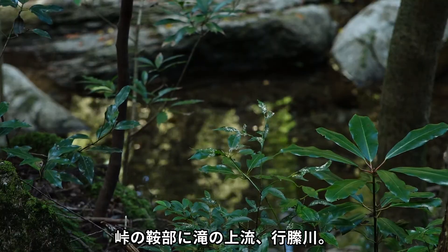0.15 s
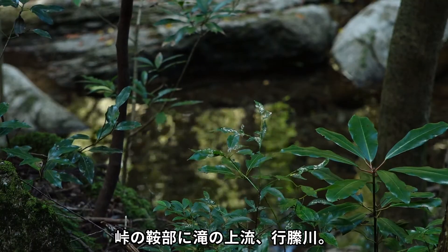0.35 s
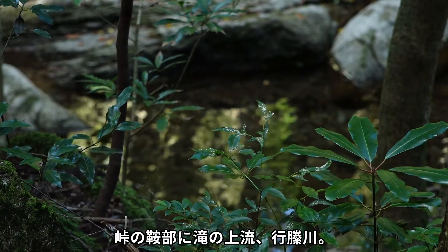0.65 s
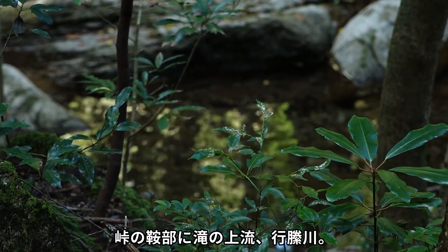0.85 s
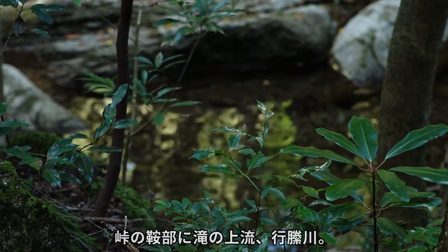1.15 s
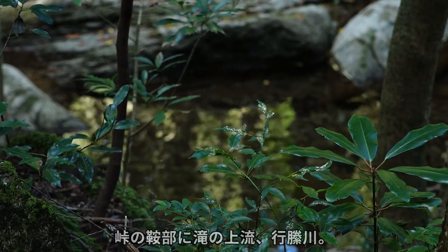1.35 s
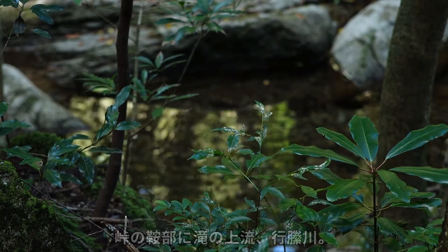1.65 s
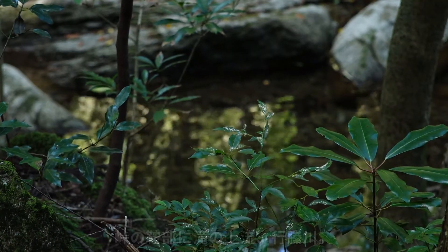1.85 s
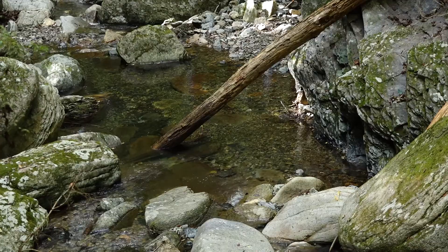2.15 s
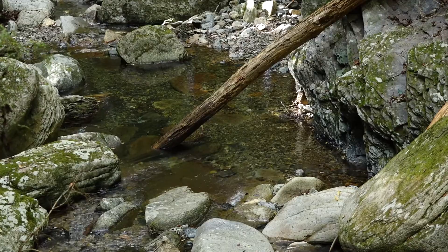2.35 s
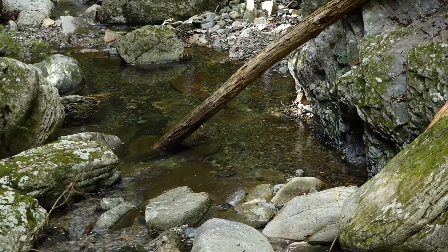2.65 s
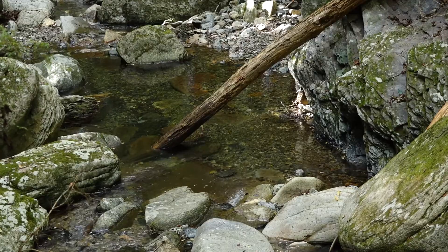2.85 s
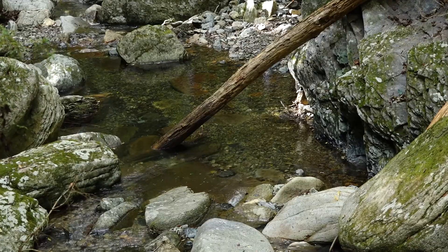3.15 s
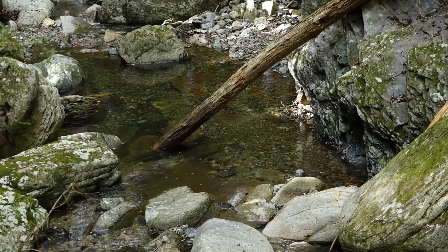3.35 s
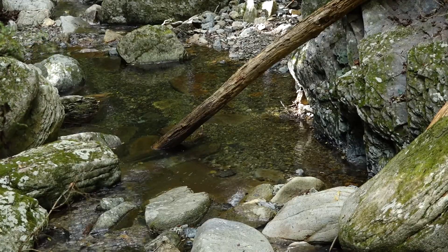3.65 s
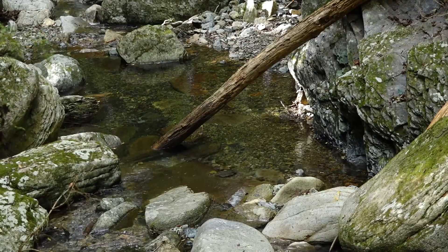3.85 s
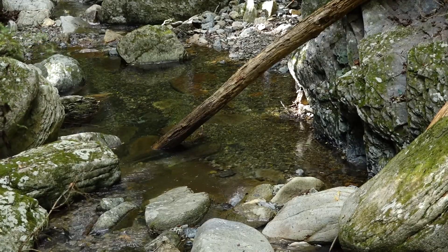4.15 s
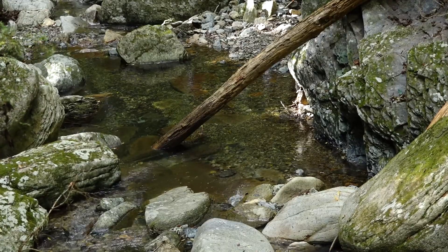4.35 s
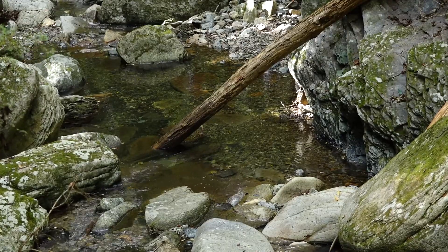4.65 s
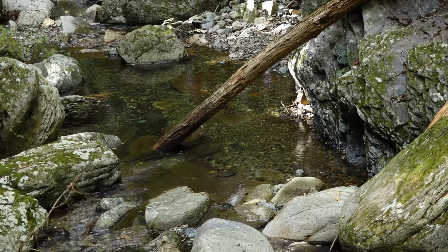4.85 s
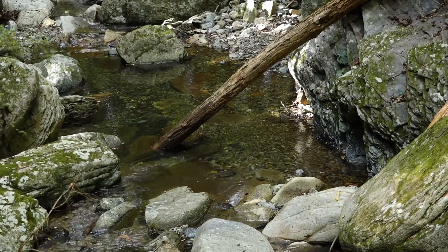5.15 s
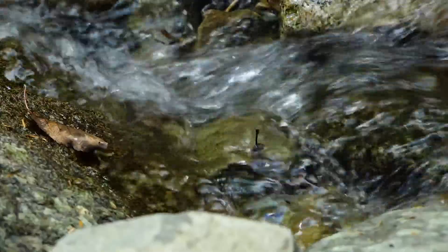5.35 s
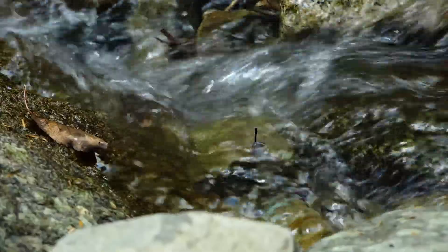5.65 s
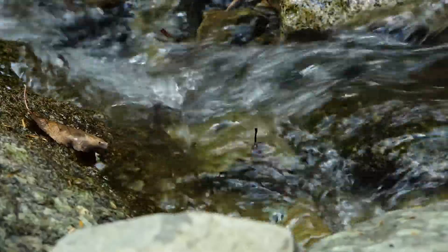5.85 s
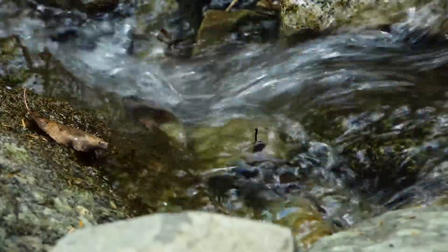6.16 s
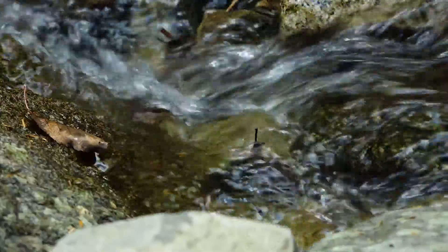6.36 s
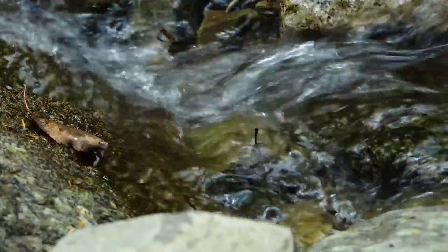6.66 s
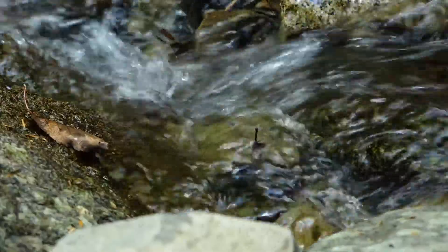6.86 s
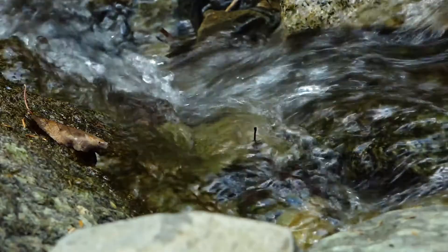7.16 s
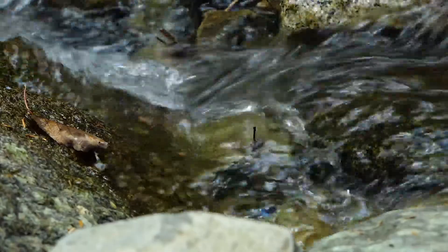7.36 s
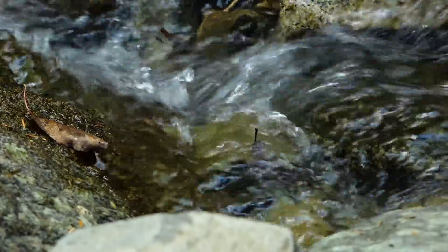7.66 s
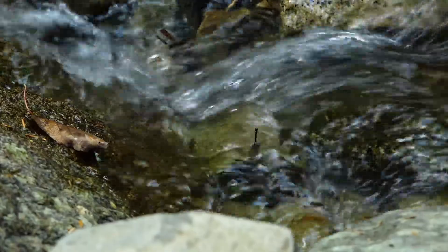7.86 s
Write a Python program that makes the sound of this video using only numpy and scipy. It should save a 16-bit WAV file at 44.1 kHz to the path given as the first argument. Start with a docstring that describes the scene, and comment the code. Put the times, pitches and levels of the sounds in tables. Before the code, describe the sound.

From 0 to 2 seconds a forest stream is heard from the bank: a smooth, soft, fairly quiet wash of fine bubbling. Two very short, faint, whistled bird chirps come at about 0.1 and 0.3 seconds, and small drips click at 0.3, 0.5 and 1.5. From 0.6 the water fades down. At 2.0 the view cuts to a boulder bed; a steady, even, hissier rush rises until about 2.8, with dull lumpy wind buffeting the stereo microphone, gusting strongest around 3.3 to 4.3 and easing near 4.8. At 5.3 a sudden cut goes close over a riffle, staying lively to the end at 8: brighter, uneven rushing, crowded gurgles and hollow plops, sharp drops around 6.0, 6.3 and 6.9, and brief crisp spatters, notably at 5.8, 6.1, 6.4, 6.9 and 7.4. It stops without a fade.

```python
"""Stream water in the mountains, heard from three spots in turn: a bank above a pool (fading out),
a windy boulder bed (fading in) and close over a riffle. Far water is a patchy noise hiss, near water
a swarm of short ringing tones, one for each bubble; the loudest bubbles and drops are placed singly.
A bird chirps twice in gliding whistles. At the second spot low, lumpy noise is the wind buffeting
the stereo microphone. At the riffle, short bursts of treble noise are splashes."""
import sys
import numpy as np
from scipy import signal
from scipy.fft import rfft, irfft, next_fast_len
from scipy.io import wavfile
from scipy.ndimage import uniform_filter1d

SR = 44100
rng = np.random.default_rng(int(sys.argv[2]) if len(sys.argv) > 2 else 0)


def to_wav(s):
    """Save 16-bit WAV."""
    ch = np.atleast_2d(s).T  # columns
    pcm = np.round(np.clip(ch, -1, 1) * 32767)  # PCM
    wavfile.write(sys.argv[1], SR, pcm.astype(np.int16))


N = 352800  # samples: 8 s


def gain_of(db):
    """Turns decibels into an amplitude factor."""
    return 10 ** (np.asarray(db) / 20)


def evened(x):
    """Scales a signal to an average power of one."""
    return x / np.sqrt(np.mean(x ** 2) + 1e-20)


def read(points, hz):
    """Reads a curve at any frequency, in straight lines over a logarithmic scale."""
    f, value = np.transpose(points)
    return np.interp(np.log(hz + 1), np.log(f + 1), value)


def level(curve, start, size):
    """Turns a table of times and decibels into a gain for each sample from start on."""
    s, db = np.transpose(curve)
    return gain_of(np.interp(start + np.arange(size) / SR, s, db))


def add(mix, s, sound):
    """Adds a sound to the mix from s seconds on, cut off at the end of the mix."""
    part = mix[:, round(s * SR):][:, :sound.shape[1]]
    part += sound[:, :part.shape[1]]


def ports(first, second, colour, same, lean, lead):
    """Colours two unrelated sounds and blends them into the left and right microphone ports."""
    size = next_fast_len(len(first))
    hz = np.fft.rfftfreq(size, 1 / SR)
    a, b = rfft(first, size), rfft(second, size)
    alike = np.clip(read(same, hz), 0, 1)
    half_lean = gain_of(read(lean, hz) / 2)
    # the right port hears the first sound shifted in phase, plus a share of the second
    right = alike * a * np.exp(-1j * read(lead, hz)) + np.sqrt(1 - alike ** 2) * b
    spectra = np.array([a * half_lean, right / half_lean]) * gain_of(read(colour, hz))
    pair = irfft(spectra, size)[:, :len(first)]
    return pair / np.sqrt(np.mean(pair.mean(0) ** 2))


def hiss(size, patchy_db, spatter_db):
    """Far water: two white noises sharing drifting patches and a brief spatter in the treble."""
    frames, hz = size // 64 + 5, np.fft.rfftfreq(256, 1 / SR)
    a, b, c, d, patches = rng.standard_normal((frames, 129, 5)).T
    # a patch spans 3 neighbouring bands and about 50 ms
    patches = uniform_filter1d(patches, size=3, axis=0)
    patches = evened(uniform_filter1d(patches, size=36, axis=1))
    spray = evened(uniform_filter1d(rng.exponential(1, frames) ** 2, size=4))
    treble = hz / (hz + 6200.0)
    change_db = patchy_db * patches + spatter_db * np.outer(treble, spray)
    z = np.array([a + 1j * b, c + 1j * d]) * gain_of(change_db)
    return evened(signal.istft(z, nperseg=256, noverlap=192)[1][:, :size])


def bubble(hz, cycles, rise, lag=0):
    """A ringing pocket of air whose pitch climbs as it nears the surface; lag in radians."""
    cycles = max(cycles, 1)
    u = np.arange(int(5 * cycles / hz * SR)) * hz / SR  # time in cycles of the first pitch
    envelope = (1 - np.exp(-2 * u)) * np.exp(-u / cycles)
    return envelope * np.sin(2 * np.pi * (u + rise * u * u / (2 * cycles)) - lag)


def swarm(size, per_s, spread_db, pitches):
    """Bubbles at random moments, small ones more often; even power per Hz."""
    out = np.zeros(size)
    for hz in pitches:
        chance = rng.random(size)
        bigness = np.minimum(rng.exponential(1, size), 5)
        starts = chance < per_s * hz ** .6 / np.sum(pitches ** .6) / SR
        train = starts * gain_of(spread_db * bigness)
        cycles = rng.uniform(0.696, 1.355) * 6.62 * (hz / 1000) ** -.3  # large pockets ring longer
        ring = bubble(hz, cycles, rng.uniform(0.06, 0.317))
        out += np.sqrt(hz) * evened(signal.oaconvolve(train, ring)[:size])
    return out / np.sqrt(len(pitches))


def water(size, grain, colour, same, lean, lead):
    """Hiss and bubbles of one spot; the rocks scatter a smeared copy of the bubbles to the far port."""
    share, per_s, spread_db, gurgle_db, patchy_db, spatter_db = grain
    share = np.clip(share, 0, 1)
    gurgle = swarm(size, 110., 1.9, np.geomspace(380, 1900, num=24))  # few large pockets
    small = swarm(size, per_s, spread_db, np.geomspace(260, 15000, num=64))
    pops = evened(small + gain_of(gurgle_db) * gurgle)
    # each narrow band arrives a few ms early or late, with its colour unchanged
    delays = 0.612 * evened(uniform_filter1d(rng.standard_normal(1025), size=4))
    rocks = irfft(np.exp(1j * np.cumsum(delays)))
    scattered = signal.oaconvolve(pops, np.roll(rocks, 1024), "same")
    bubbles = np.array([pops, scattered])
    both = np.sqrt(1 - share) * hiss(size, patchy_db, spatter_db) + np.sqrt(share) * bubbles
    return ports(*both, colour, same, lean, lead)


# when each listening spot is heard: (from t/s, to t/s)
LISTENING_SPOTS = [(0, 2.018), (2.018, 5.315), (5.315, 8)]
# water level at each spot, before the fader: (level/dB)
WATER_LEVELS = [-26.5, -25, -24]
# make-up of the water, one row a spot: (bubble share of the power [0-1], bubbles [per s],
# level spread [dB], gurgle over the other bubbles [dB], patches [dB], treble spatter [dB])
WATER_GRAIN = [(0.21, 3000, 1, -10, 0.1, 0), (0.1, 3000, 0, -9, .5, -1), (0.2, 2500, 2.5, -3.5, 1.17, 3.1)]
# spectrum of each spot's water, before the shared treble colour; at the first two spots the sound # ends near
# 15.1 kHz: (f/Hz, relative level/dB per Hz)
BANK_COLOUR = [(15, -76), (25, -49), (70, -26), (193, -17), (234, -11.5), (380, -14), (520, -6.5),
               (630, -5), (793, -7.5), (1000, -7), (2400, -10.5), (5000, -12), (9000, -12.5),
               (14900, -17.5), (15100, -75)]
BED_COLOUR = [(40, -45), (180, -11), (300, -4), (459, -7), (618, -2), (882, -4), (1040, -2.5), (2400, -6),
              (5000, -7.5), (9000, -6), (14950, -6), (15150, -65)]
RIFFLE_COLOUR = [(15, -65), (25, -42), (97, -19.5), (182, -13), (216, -12), (456, -6), (552, -4.5),
                 (694, -2.5), (1700, -5), (2400, -6), (5000, -7.5), (9000, -6.5), (15000, -7.5)]
# treble colour shared by the water and the splashes: (f/Hz, level/dB)
TREBLE_COLOUR = [(2600, 0), (3500, 1), (4400, 1.5), (5300, -2), (6700, -8), (7600, -7.5), (8600, -7),
                 (9500, -12.5), (10800, -20), (14500, -21)]
# likeness of the two ports, facing near water and the boulder bed: (f/Hz, likeness [0-1])
NEAR_LIKENESS = [(130, .999), (500, .98), (700, .95), (1400, .89), (2800, .86), (4000, .91), (5000, .86),
                 (7000, .5), (9500, .4), (11000, .5)]
BED_LIKENESS = [(40, 1), (100, .97), (200, .89), (350, .78), (700, .92), (1400, .8), (4000, .87),
                (5000, .81), (7000, .25), (8000, .15), (11000, .5)]
# how much louder the left port is: (f/Hz, left over right level/dB)
NEAR_BALANCE = [(60, 1), (150, 0.5), (380, -1), (950, 0.5), (2380, 3), (5980, 0.5), (15000, 1)]
BED_BALANCE = [(60, -0.5), (150, -2.5), (380, -2), (950, -2.0), (2380, 0), (5980, 0), (15000, -1)]
# how far the left port is ahead: (f/Hz, lead [radians])
NEAR_AHEAD = [(70, 0), (200, .2), (1000, .7), (2000, .5), (4000, .1), (9500, .1), (11000, -.1)]
BED_AHEAD = [(50, 0), (200, .5), (1200, .7), (2800, .3), (5000, -.1), (7000, -.7), (11000, -.1)]


def stream():
    """The water of the three spots joined end to end, each with its own colour and grain."""
    near = (NEAR_LIKENESS, NEAR_BALANCE, NEAR_AHEAD)
    bed = (BED_LIKENESS, BED_BALANCE, BED_AHEAD)
    views = [(BANK_COLOUR, near), (BED_COLOUR, bed), (RIFFLE_COLOUR, near)]
    grid = np.geomspace(15, 16000, num=900)
    parts = []
    for (t0, t1), db, grain, (colour, facing) in zip(LISTENING_SPOTS, WATER_LEVELS, WATER_GRAIN, views):
        heard = [(hz, read(colour, hz) + read(TREBLE_COLOUR, hz)) for hz in grid]
        size = round(t1 * SR) - round(t0 * SR)
        parts.append(water(size, grain, heard, *facing) * gain_of(db))
    return np.hstack(parts)


# a far bird: (t/s, length [s], first f/Hz, middle f/Hz, last f/Hz, level/dB before the flutter)
BIRD_CHIRPS = [(.085, .078, 3080, 3465, 3480, -37), (.292, .028, 3930, 3850, 3700, -34)]


def bird():
    """Faint arched whistles, fluttering after their way through the trees."""
    out = np.zeros((2, N))
    for s, length, first_hz, middle_hz, last_hz, db in BIRD_CHIRPS:
        u = np.arange(0, length, 1 / SR) / length
        arch_hz = middle_hz - (first_hz + last_hz) / 2
        hz = first_hz + (last_hz - first_hz) * u + arch_hz * np.sin(np.pi * u)
        flutter_db = 3 * evened(uniform_filter1d(rng.standard_normal(len(u)), size=90))
        tone = np.sqrt(2) * np.sin(2 * np.pi * np.cumsum(hz) / SR)
        chirp = tone * gain_of(db + flutter_db) * signal.windows.tukey(len(u), .2)
        add(out, s, chirp[None])
    return out


# the loudest bubbles and drops: (t/s, level/dB before the left-right balance, pitch f/Hz,
# cycles to fade by 1/e, pitch rise in that time [share])
LOUD_BUBBLES = [(0.312, -15, 3750, 4.8, 0), (0.52, -14, 5180, 2.5, .2), (1.516, -17, 2670, 4, .3),
                (1.876, -22, 2390, 9, .42), (3.238, -22, 2180, 6.9, .47), (4.092, -22.5, 865, 12, .1),
                (5.293, -11, 3460, 3.3, .12), (5.323, -20, 910, 6.6, 0), (5.382, -12, 8270, 4, 0),
                (5.4, -16, 4300, 8.3, 0), (5.425, -24, 805, 18, 0.42), (5.443, -6, 4440, 1.3, .06),
                (5.452, -23, 490, 7, 0.037), (5.498, -24.5, 510, 12, 0), (5.623, -19.5, 1670, 13, .04),
                (5.636, -17, 2590, 6.2, 0.32), (5.654, -19, 640, 11.4, 0.067), (5.69, -14, 1790, 6, 0),
                (5.734, -20, 506, 4, 0.022), (5.735, -21, 870, 12, 0.05), (5.735, -20, 1630, 9, .075),
                (5.802, -15, 7700, 6, 0.029), (5.874, -10, 3550, 4.8, 0), (5.891, -23.5, 755, 20, 0.031),
                (5.98, -11, 2030, 2.5, .06), (6.027, -4, 4000, 2.1, .06), (6.136, -13, 5090, 4, .06),
                (6.137, -15, 1030, 4, .25), (6.141, -14, 1320, 8.1, 0), (6.247, -11, 6670, 2.5, .2),
                (6.262, -0.5, 4250, 1.9, .15), (6.295, -14.5, 1100, 4.4, .07), (6.302, -14, 4820, 6, .5),
                (6.354, -18, 1560, 7, 0), (6.355, -21, 780, 11, .1), (6.364, -23, 430, 6.1, 0.11),
                (6.388, -16, 2060, 12, .82), (6.419, -9, 4070, 3.3, 0.031), (6.44, -8, 7040, 2.5, 0.034),
                (6.444, -24, 667, 14, .07), (6.519, -21, 1060, 14, 0), (6.619, -24, 1410, 14, 0),
                (6.637, -24, 850, 10, 0.25), (6.644, -18, 1560, 6, 0), (6.709, -12, 2510, 4, .4),
                (6.808, -22, 643, 9.2, 0.31), (6.827, -20, 1340, 8.6, .17), (6.89, -21, 585, 7.8, 0.04),
                (6.895, -27, 415, 9.8, .07), (6.906, -4.5, 4490, 1.5, .35), (6.934, -19, 1300, 7, .07),
                (6.971, -13.5, 1420, 7.7, 0.11), (7.004, -21, 1330, 16, 0.084), (7.005, -9, 670, 1.4, 0.33),
                (7.179, -15, 7170, 3.7, .04), (7.248, -14, 6430, 2.5, .2), (7.336, -9.5, 2110, 2.5, .06),
                (7.358, -18, 3000, 9, 0.18), (7.427, -17, 1660, 7, 0.054), (7.446, -25, 710, 10, 0.12),
                (7.557, -17, 1130, 4, 0), (7.589, -22, 910, 10, .1), (7.687, -16, 770, 4, 0),
                (7.728, -16, 1090, 4.2, 0.18), (7.745, -18, 3840, 17, 0), (7.756, -18, 1000, 4, 0),
                (7.773, -9, 4200, 2.5, .06), (7.782, -22.5, 687, 15, .045), (7.928, -17, 2020, 13, 0.032),
                (7.946, -21, 475, 3.6, 0.18), (7.954, -16, 1890, 6.2, 0.24), (7.964, -16, 1380, 7.8, 0),
                (7.974, -18, 680, 4.6, .2)]


def single_bubbles():
    """The loudest bubbles and drops, reaching the two ports as the water around them does."""
    out = np.zeros((2, N))
    bed_from, bed_to = LISTENING_SPOTS[1]
    for s, db, hz, cycles, rise in LOUD_BUBBLES:
        at_bed = bed_from < s < bed_to
        lean, lead = (BED_BALANCE, BED_AHEAD) if at_bed else (NEAR_BALANCE, NEAR_AHEAD)
        half_db = read(lean, hz) / 2
        pair = np.array([bubble(hz, cycles, rise), bubble(hz, cycles, rise, read(lead, hz))])
        add(out, s, pair * gain_of([[db + half_db], [db - half_db]]))
    return out


# fader ramps, straight in amplitude: the first spot sinks, the second rises
FADE_OUT_FROM_S, FADE_OUT_DB = 0.63, -6.5
FADE_IN_UNTIL_S, FADE_IN_DB = 2.77, -9.5


def fader():
    """Gain that sinks towards the first change of spot and climbs back after it."""
    t, cut = np.arange(N) / SR, LISTENING_SPOTS[1][0]
    sinking = np.interp(t, [FADE_OUT_FROM_S, cut], [1, gain_of(FADE_OUT_DB)])
    rising = np.interp(t, [cut, FADE_IN_UNTIL_S], [gain_of(FADE_IN_DB), 1])
    return np.where(t < cut, sinking, rising)


# strength of the wind, before the fader: (t/s, level/dB)
WIND_GUSTS = [(2.02, -40), (2.3, -43), (2.38, -35), (2.46, -40), (2.68, -32), (2.8, -37.5), (2.95, -33),
              (3.2, -35), (3.25, -27), (3.5, -30), (4.12, -29.5), (4.23, -25.5), (4.28, -34), (4.33, -26),
              (4.4, -38), (4.54, -32), (4.78, -42.5), (5.0, -37), (5.23, -31), (5.32, -36)]
# spectrum of the wind: (f/Hz, relative level/dB per Hz)
WIND_COLOUR = [(12, -44), (20, -18), (57, -4), (102, -1), (172, -4), (313, -9.5), (347, -26), (389, -10.5),
               (420, -11.5), (550, -34), (920, -120)]


def wind(start_s, size):
    """Low turbulence on the microphone, in lumps some 30 ms long, rising and falling in gusts."""
    a, b, lumps = rng.standard_normal((3, size))
    lumps = uniform_filter1d(uniform_filter1d(lumps, 1300), 1300)
    lumps = gain_of(2.2 * evened(lumps))
    buffets = ports(a * lumps, b * lumps, WIND_COLOUR, BED_LIKENESS, BED_BALANCE, BED_AHEAD)
    return buffets * level(WIND_GUSTS, start_s, size)


# bright splashes at the riffle: (t/s, burst level/dB before the attack and treble filter)
SPLASH_BURSTS = [(5.35, -35), (5.472, -36), (5.771, -28), (5.803, -31), (6.126, -24), (6.317, -36),
                 (6.408, -30), (6.501, -31), (6.884, -30), (6.91, -36), (7.03, -36), (7.191, -35),
                 (7.413, -28), (7.531, -31), (7.833, -35)]
SPLASH_T60_S = 0.025  # time to die away by 60 dB


def splashes():
    """Short bursts of spray, bright and nearly central, in the shared treble colour."""
    t, drive = np.arange(2000) / SR, np.zeros((1, N))
    for s, db in SPLASH_BURSTS:
        attack = 1 - np.exp(-t / 0.00042)
        add(drive, s, gain_of([db - 60 * t / SPLASH_T60_S]) * attack)
    # one noise shared by both ports, plus a weaker one for each
    noise = rng.standard_normal(N) + .5 * rng.standard_normal((2, N))
    hz = np.fft.rfftfreq(N, 1 / SR)
    colour = gain_of(read(TREBLE_COLOUR, hz) - TREBLE_COLOUR[-1][1])
    bright = colour / (1 + (9500 / (hz + 1)) ** 6)  # weakens what lies below 9.5 kHz
    return irfft(rfft(drive * noise) * bright, N)


def scene():
    """Water and wind pass through the fader; single bubbles, splashes and bird are added after it."""
    faded = stream()
    bed_from, bed_to = LISTENING_SPOTS[1]
    first, last = round(bed_from * SR), round(bed_to * SR)
    faded[:, first:last] += wind(bed_from, last - first)
    return faded * fader() + bird() + single_bubbles() + splashes()


EDGE_HZ, WIDTH_EDGE_HZ = 15830, 11800  # top of the sound, top of the stereo width


def record(dry):
    """Low-passes the sound at 15.8 kHz and its stereo width at 11.8 kHz."""
    def low_pass(x, hz):
        """Keeps what lies below hz."""
        return signal.oaconvolve(x, signal.firwin(511, hz, window=("kaiser", 9), fs=SR), "same")

    mid = low_pass((dry[0] + dry[1]) / 2, EDGE_HZ)
    side = low_pass((dry[0] - dry[1]) / 2, WIDTH_EDGE_HZ)
    return np.array([mid + side, mid - side])


dry = scene()
out = record(dry)
to_wav(out)
```